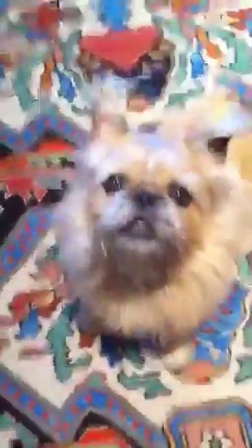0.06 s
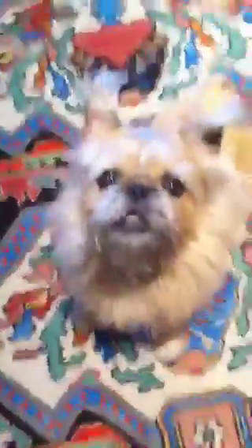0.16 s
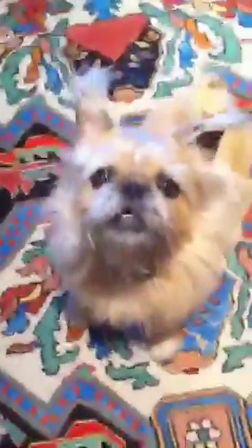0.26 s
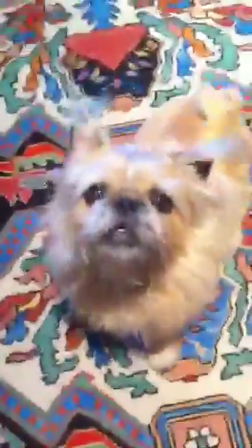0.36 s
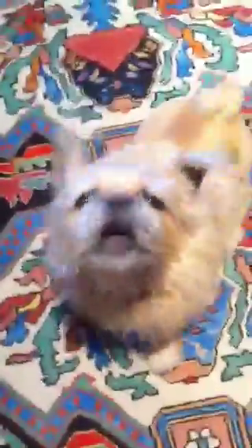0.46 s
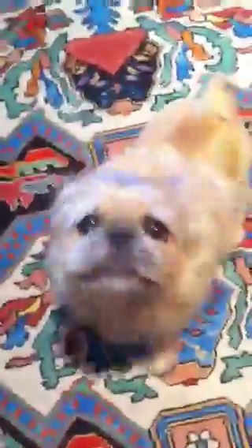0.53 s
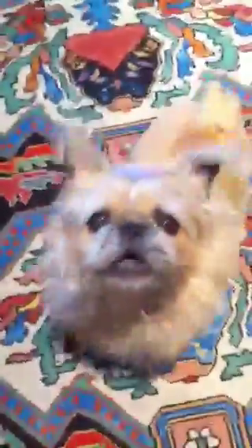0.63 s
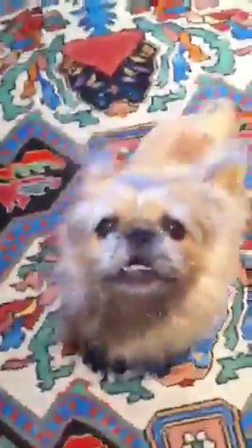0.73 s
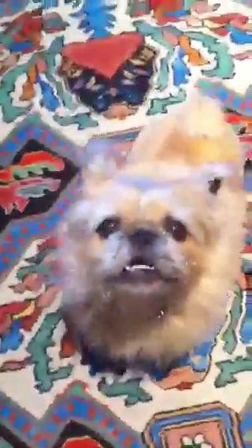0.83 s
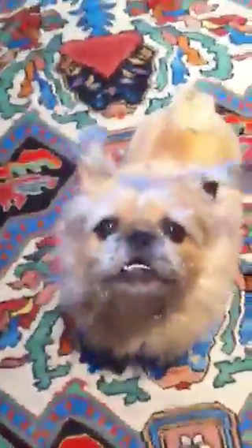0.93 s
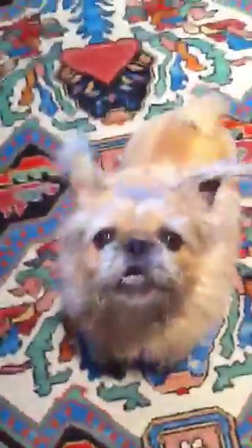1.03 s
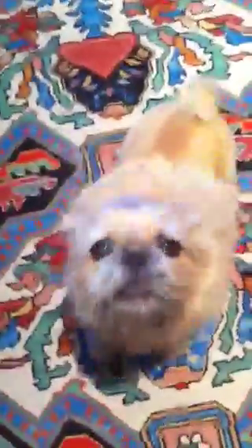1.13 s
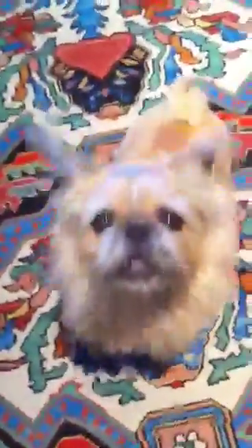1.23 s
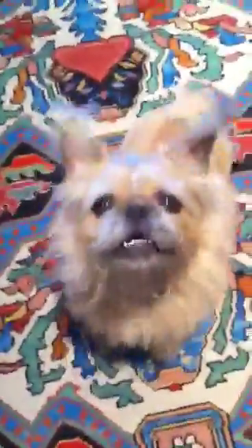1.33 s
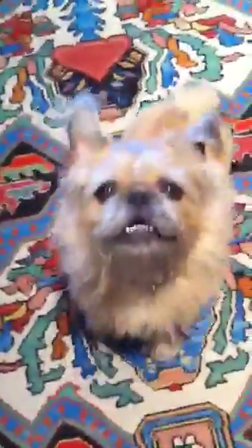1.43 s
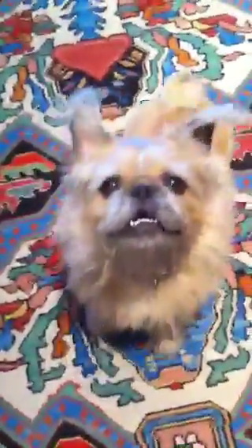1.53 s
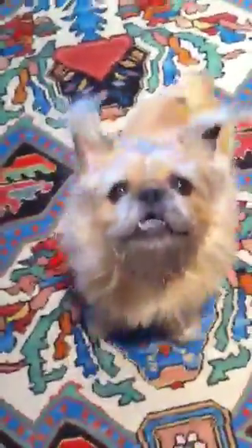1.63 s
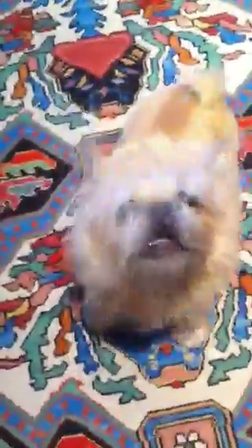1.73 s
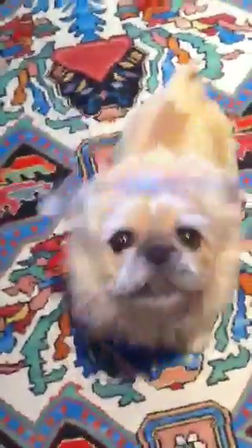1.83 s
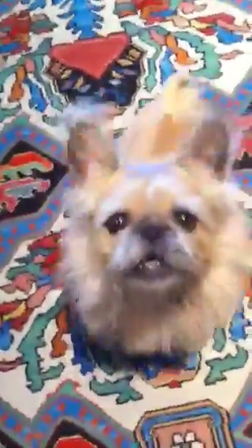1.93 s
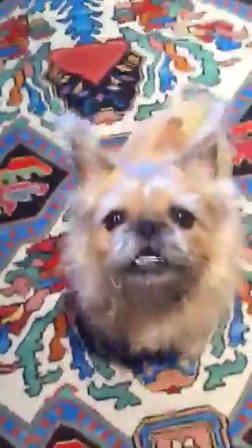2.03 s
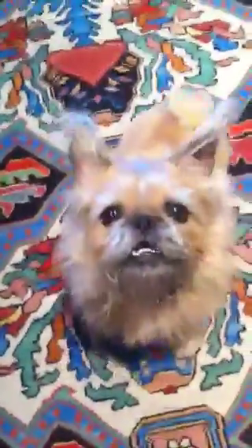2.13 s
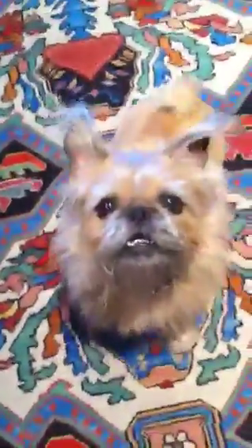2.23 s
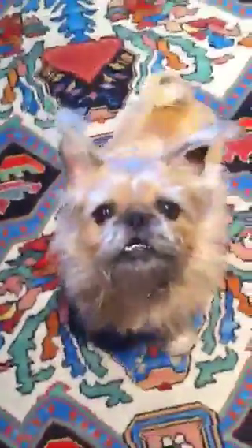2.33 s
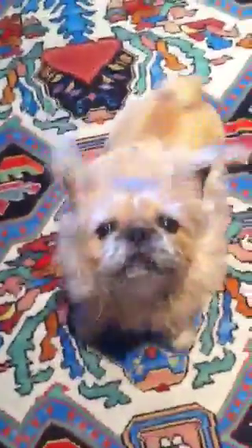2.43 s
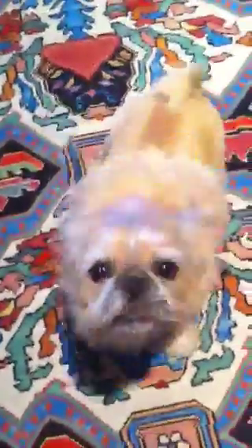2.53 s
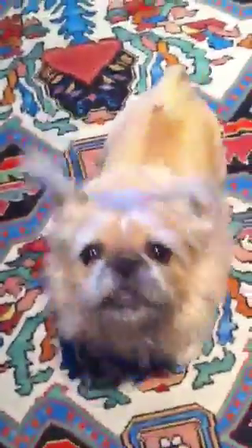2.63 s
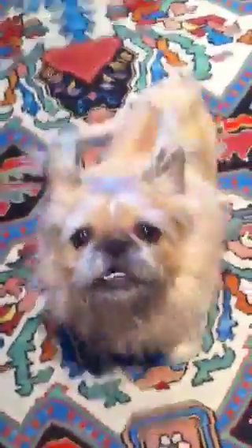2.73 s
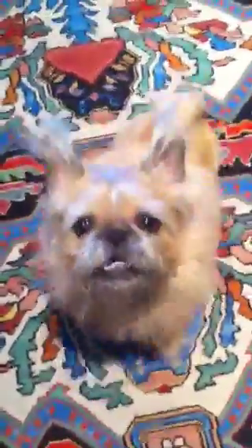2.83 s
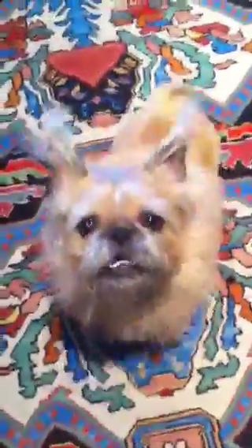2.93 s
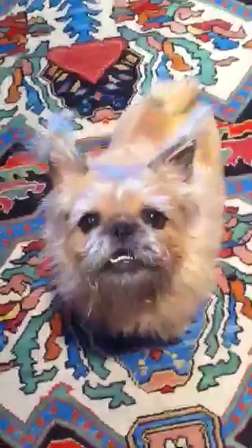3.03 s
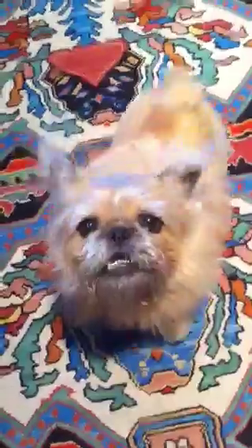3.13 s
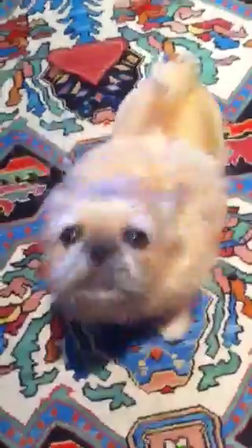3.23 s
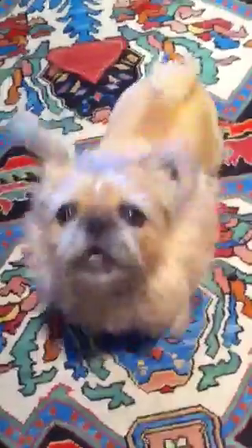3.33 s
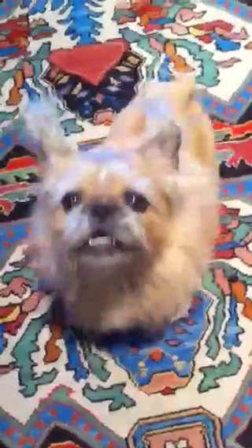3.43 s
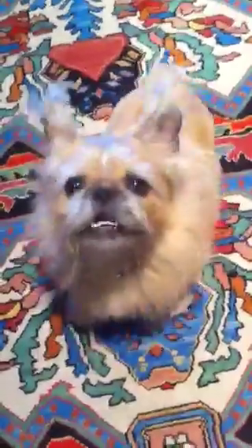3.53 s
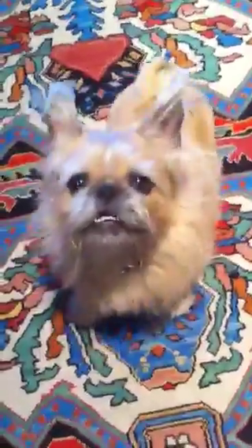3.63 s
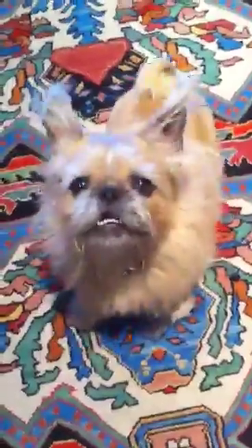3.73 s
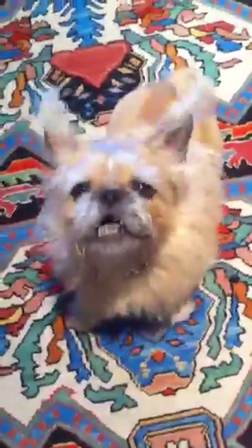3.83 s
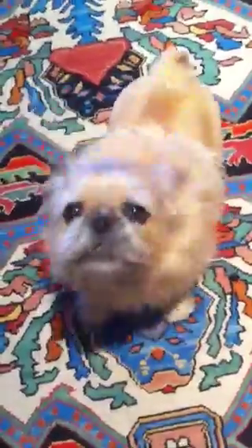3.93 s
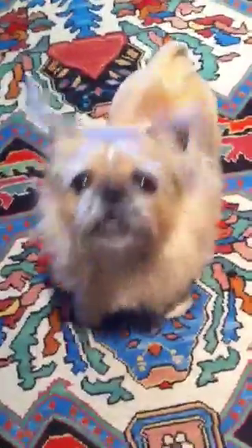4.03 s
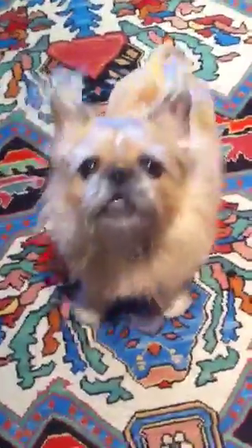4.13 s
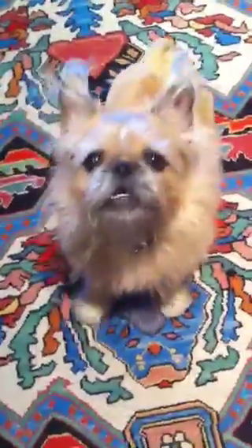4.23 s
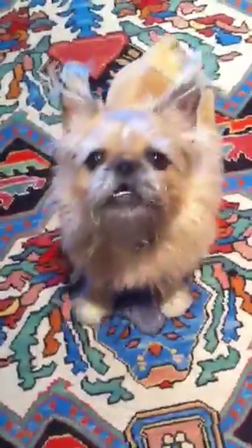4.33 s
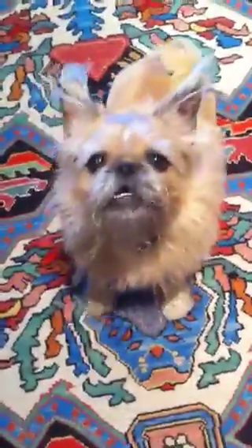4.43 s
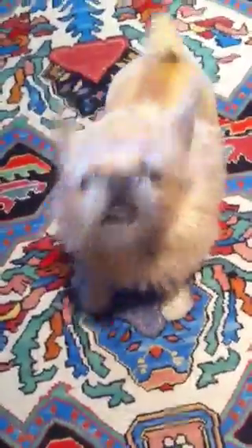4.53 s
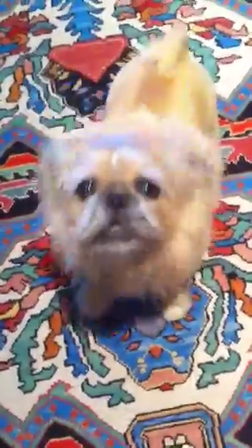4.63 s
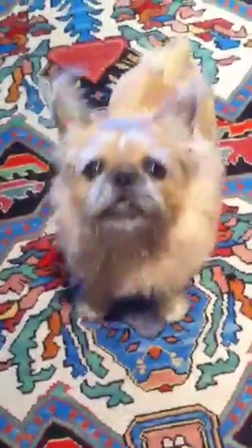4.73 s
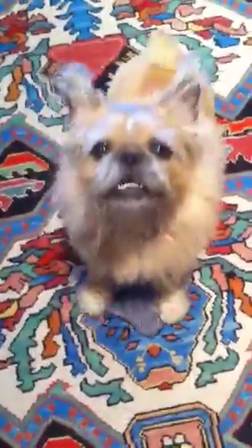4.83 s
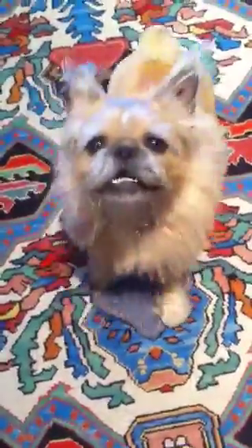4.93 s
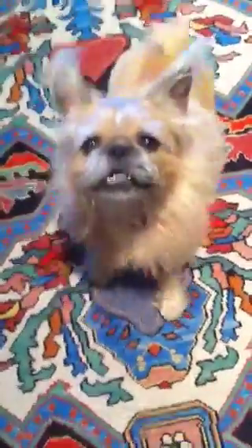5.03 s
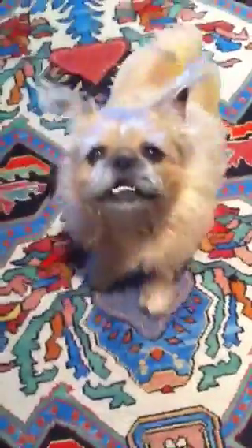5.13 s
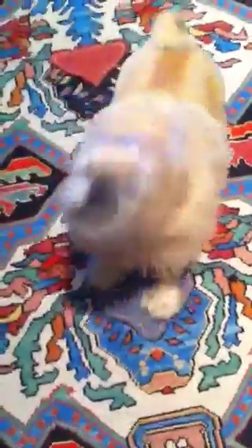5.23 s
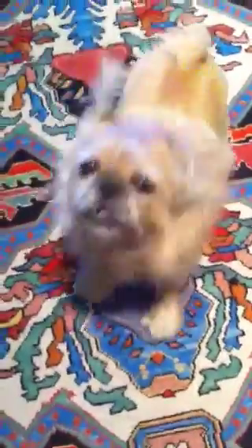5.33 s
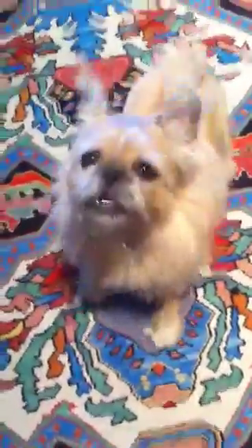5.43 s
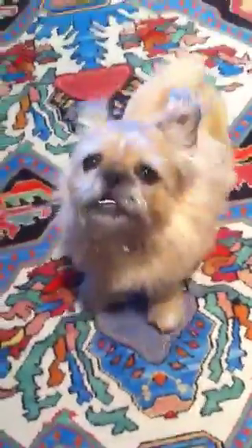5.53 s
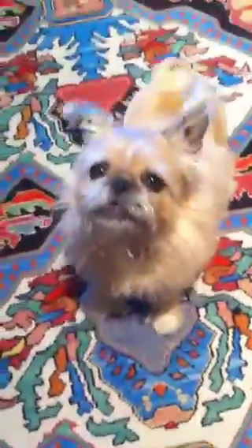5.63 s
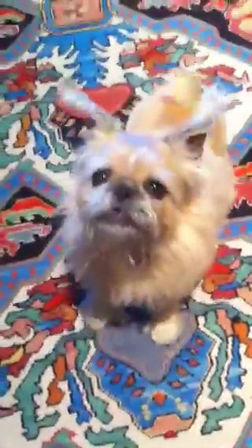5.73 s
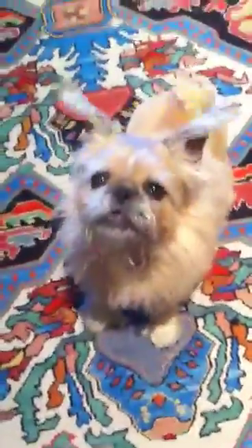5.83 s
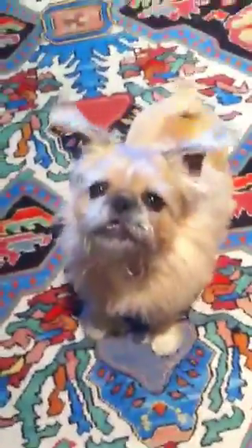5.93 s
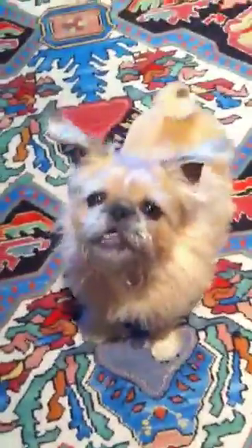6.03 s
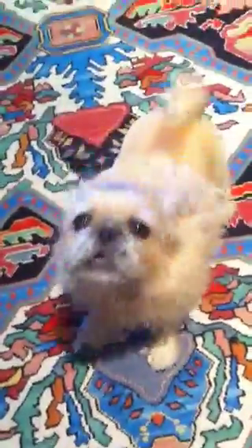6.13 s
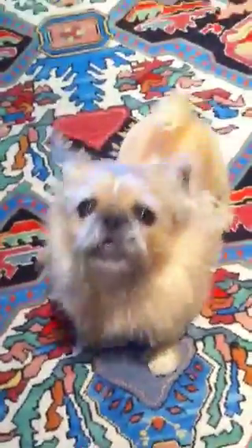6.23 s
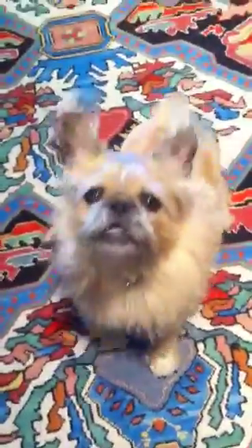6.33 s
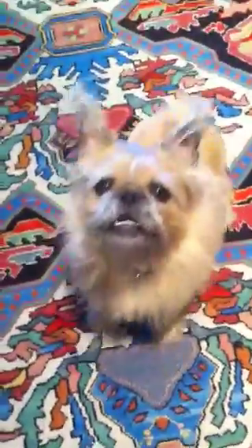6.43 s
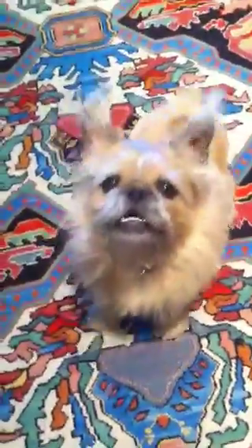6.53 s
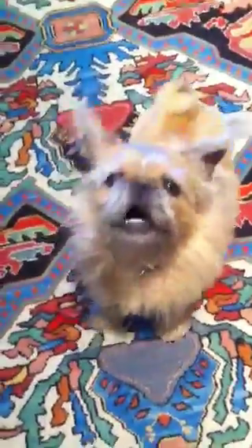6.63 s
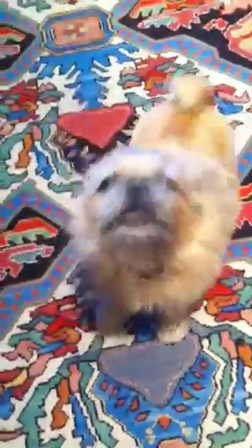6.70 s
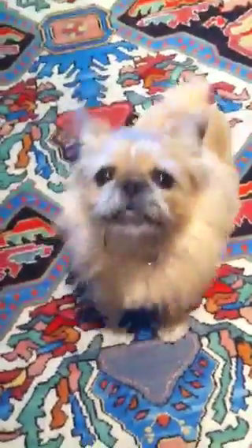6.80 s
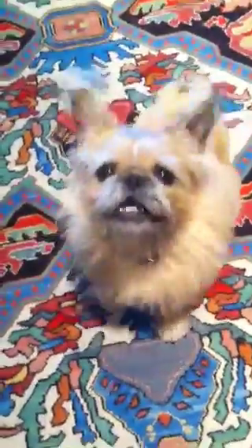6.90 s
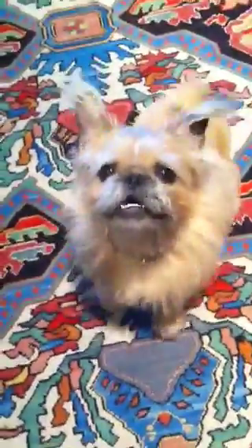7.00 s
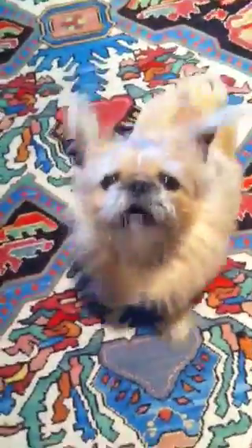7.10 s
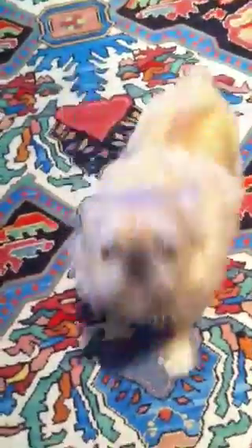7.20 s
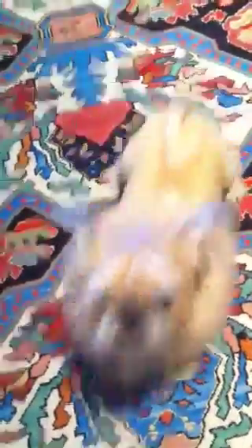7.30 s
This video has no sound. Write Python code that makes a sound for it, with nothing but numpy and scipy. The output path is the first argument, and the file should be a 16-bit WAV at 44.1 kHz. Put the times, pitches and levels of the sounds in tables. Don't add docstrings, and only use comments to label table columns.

```python
import sys
import numpy as np
from scipy import signal
from scipy.fft import rfft, irfft
from scipy.io import wavfile
from scipy.ndimage import uniform_filter1d

SR = 44100
rng = np.random.default_rng(int(sys.argv[2]) if len(sys.argv) > 2 else 0)


def store_pcm(level_fs):
    pcm = np.round(np.clip(level_fs, -1, 1) * 32767).astype(np.int16)
    wavfile.write(sys.argv[1], SR, np.atleast_2d(pcm).T)


def ratio(d):
    e = np.asarray(d, float) / 20
    return 10 ** e


N = 324576
LEAD = 16384

# (start [s], length [s], effort [dB], jaw re throat [dB], mouth re throat [dB])
BARKS = [(-.33, 0.066, -2.5, -6, -13), (0.549, 0.099, -10.5, -8.5, -17.5),
         (1.17, 0.081, -12.5, -7.5, -18.5), (1.813, 0.087, -12, -7, -13), (2.551, 0.1, -12, -6.5, -10),
         (3.282, 0.083, -11.5, -4.5, -6.5), (3.959, 0.11, -10, -7.5, -17), (4.613, 0.1, -11, -6.5, -14.5),
         (5.299, .1, -15, -1.5, -4.5), (6.173, 0.11, -9.5, -7.5, -17.5), (6.749, 0.1, -11.5, -2.5, -13),
         (7.223, 0.12, -5, -4.5, -8.5)]
# (first pitch [Hz], top pitch [Hz], climb [s], hold [s])
SLIDES = [(718.4, 971, .02, .015), (868, 980, 0.013, 0.035), (872, 970, 0.014, 0.04),
          (868, 1050, .03, 0.024), (564, 1000, .034, .008), (538.8, 950, .028, .012),
          (881.6, 1010, .02, 0.022), (707, 950, 0.021, 0.016), (540.8, 1130, .03, 0.037),
          (739, 990, 0.021, 0.0089), (798.8, 1080, .04, 0.031), (608.5, 1170, 0.031, .012)]
# (frequency [Hz], width [Hz], level [dB])
THROAT_MODES = [(526, 276, 3.5), (999, 490, 6.5), (1110, 1500, -15.5)]
JAW_MODES = [(1334, 673, 2), (1913, 220, 3.5), (2088, 365, -0.5)]
MOUTH_MODES = [(2930, 680, 1), (3845, 904, 5), (4130, 686, 5.5), (4920, 1100, -10)]
TEETH_MODES = [(5850, 800, -3), (8330, 1380, 2), (11370, 2200, 0.5), (14000, 1800, -1.5)]
# (start [s], length [s], top reed pitch [Hz], eased reed pitch [Hz], level [dB])
SQUEAKS = [
    (0.394, 0.079, 1246, 1225, -33),
    (1.419, 0.09, 1435, 1347, -32),
    (2.135, .088, 1194, 1171, -38),
    (2.856, .088, 1281, 1216, -34),
    (3.65, 0.075, 1186, 1149, -39),
    (4.362, 0.099, 1304, 1217, -33),
    (4.991, 0.1, 1183, 1083, -38),
]
# (frequency [Hz], partial level [dB])
SHELL = [(1000, 11), (1400, -12), (2400, -28.5), (3600, -15.5), (4700, -3.5), (6000, -18.5), (8300, -8),
         (10000, -22.5), (12000, -11.5), (14500, -36), (15900, -20)]
# (start [s], peak [dB], centre [Hz], t60 [s])
STEPS = [
    (0.899, -44.5, 864, 0.11),
    (5.152, -50.5, 2340, 0.12),
    (5.194, -49, 738, 0.1),
    (5.254, -42, 780, 0.046),
    (6.668, -38.5, 750, 0.07),
]
# (start [s], end [s], frequency [Hz], width [Hz], level [dB])
HELD_TONES = [
    (0.39, 1.15, 3400, 100, -68),
    (2.042, 2.202, 285, 18, -60),
    (6.025, 6.05, 1130, 63, -60),
    (2.81, 2.83, 2000, 120, -46.5),
    (3.19, 3.215, 1930, 250, -49),
    (2.385, 2.47, 3300, 900, -64.5),
    (7.165, 7.21, 2500, 250, -58),
]
# (start [s], length [s], rustle [dB], shuffle [dB])
STIRRINGS = [(0.327, 0.26, -75, -60), (0.471, 0.051, -77, -71), (0.696, 0.11, -61.5, -52),
             (0.832, 0.34, -60.5, -61.5), (1.35, 0.082, -61, -47.5), (1.47, 0.36, -61.5, -60.5),
             (1.894, 0.049, -60, -39), (1.998, 0.097, -68, -53), (2.196, 0.1, -69, -62.5),
             (2.373, .1, -69, -56.5), (2.656, 0.2, -59, -46.5), (2.93, 0.25, -63.5, -62),
             (3.158, 0.12, -59, -49.5), (3.377, 0.34, -62.5, -60), (3.73, 0.044, -66, -59),
             (3.869, 0.079, -67, -58.5), (4.15, 0.063, -67, -62), (4.24, 0.13, -68.5, -76),
             (4.46, 0.19, -74, -64), (4.694, 0.068, -61, -41), (4.79, 0.15, -59.5, -52.5),
             (4.968, 0.3, -59, -60), (5.385, 0.053, -56, -63), (5.57, 0.17, -64.5, -66),
             (5.947, .1, -69, -82.5), (6.254, 0.24, -59.5, -48.5), (6.552, .17, -64, -62),
             (6.823, 0.056, -48, -69), (6.938, 0.16, -75, -60), (7.124, 0.097, -66.5, -59)]
# (frequency [Hz], density [dB per Hz])
FUR_SPECTRUM = [(1470, -44), (2500, -10), (3460, -2), (4420, -10), (5320, -4), (10600, -6.5), (11700, -7),
                (15800, -12.5)]
RUG_SPECTRUM = [(180, -38.5), (300, -15.5), (583, -28), (749, -16.5), (1010, -15), (1150, -12.5),
                (2430, -16.5), (6000, -37.5), (7800, -57), (13200, -120)]
ROOM_TONE_SPECTRUM = [(15, -75.5), (25, -18.5), (33, -27), (91, -32.5), (123, 2), (157, -6.5), (248, -5.5),
                      (291, -10.5), (371, -5.5), (473, -8.5), (1090, -17.5), (2200, -37.5), (15800, -29)]
# (frequency [Hz], t60 [s])
ROOM_T60 = [(250, 0.71), (700, 0.78), (2000, 0.56), (5000, 0.34), (12000, 0.37)]
# (frequency [Hz], width [Hz], level [dB])
ROOM_MODES = [(539.6, 36, -8), (1110, 31, 1.5), (1130, 64, -10), (762, 32, 7)]

BREAK_S, BROKEN_HZ, LAST_HZ = 0.009, 663.2, 560.8
CLIMB_DB, BREAK_DB, SAG_DB_PER_S = 1, -5.5, 125.5
JAW_BREAK_DB, JAW_LAST_DB = 10, -3
MOUTH_SHUTS_DB_PER_S, HISS_FADE_DB_PER_S = 142, 130
HOARSE_SHARE = 0.7
CLEAR_S, CLEAR_S_PER_OCTAVE = 0.007, 0.011
ATTACK_S, ATTACK_S_PER_OCTAVE = 0.017, 0.0074
CHEST_HZ, CHEST_DB = 237, -37

REED_REST_HZ, REED_START_SHARE = 1034.4, 0.75
REED_WAKE_S, REED_WAKE_SHARE = 0.004, 0.85
PRESS_SHARE, EASE_SHARE, LET_GO_S = 0.24, 0.4, 0.013
REED_DB_PER_OCTAVE, LET_GO_DB = 29, -21
LOWEST_START_DB, LOWEST_END_DB = 1, -4


def at_hz(points, hz):
    point_hz, value = np.transpose(points)
    return np.interp(np.log(hz + 1), np.log(point_hz), value)


def rms_one(x):
    return x / np.sqrt(np.mean(x ** 2) + 1e-20)


def lowpass(x, hz):
    return signal.sosfilt(signal.butter(2, hz, fs=SR, output="sos"), x)


def bandpass(x, low_hz, high_hz):
    return signal.sosfilt(signal.butter(2, [low_hz, high_hz], "band", fs=SR, output="sos"), x)


def drift(size, hz):
    return rms_one(lowpass(rng.standard_normal(size + 4000), hz)[4000:])


def coloured(spectrum):
    white = rfft(rng.standard_normal(N))
    return rms_one(irfft(white * ratio(at_hz(spectrum, np.fft.rfftfreq(N, 1 / SR))), N))


def resonances(x, modes):
    out = 0
    for k, (hz, width_hz, db) in enumerate(modes):
        r = np.exp(-np.pi * width_hz / SR)
        b = (1 - r * r) / 2 * np.array([1, 0, -1])
        a = [1, -2 * r * np.cos(2 * np.pi * hz / SR), r * r]
        out = out + (-1) ** k * ratio(db) * signal.lfilter(b, a, x)
    return out


def patchy(x, patch_db):
    out = 0
    for low_hz in 1500 * 1.16 ** np.arange(16):
        out = out + bandpass(x, low_hz, low_hz * 1.16) * ratio(patch_db * drift(len(x), 12.4))
    return rms_one(out) * np.sqrt(np.mean(x ** 2))


def edges(size, rise_s, fall_s):
    t = np.arange(size) / SR
    return np.clip(t / rise_s, 0, 1) * np.clip(t[::-1] / fall_s, 0, 1)


def add_at(out, start_s, x):
    at = LEAD + round(start_s * SR)
    out[at:at + len(x)] += x


def in_time(rows, t):
    s, *columns = np.transpose(rows)
    return [np.interp(t, s, c) for c in columns]


def bark_shape(row, slide):
    s, length_s, effort_db, jaw_db, mouth_db = row
    first_hz, top_hz, climb_s, hold_s = slide
    turns = np.append(np.cumsum([0, climb_s, hold_s, BREAK_S]), length_s)
    last_db = BREAK_DB - SAG_DB_PER_S * (turns[4] - turns[3])
    hz = [first_hz, top_hz, top_hz, BROKEN_HZ, LAST_HZ]
    throat_db = effort_db + np.array([CLIMB_DB, 0, 0, BREAK_DB, last_db])
    jaw_db = jaw_db + np.array([0, 0, 0, JAW_BREAK_DB, JAW_LAST_DB])
    return np.transpose([s + turns, hz, throat_db, jaw_db, mouth_db - MOUTH_SHUTS_DB_PER_S * turns])


def glottis(hz, hoarse):
    size = len(hz)
    cycles = np.cumsum(hz * (1 + 0.08 * hoarse * drift(size, 150))) / SR
    order = np.arange(1, 15)[:, None]
    waver = np.array([drift(size, 60) for _ in order])
    partials = np.cos(2 * np.pi * order * cycles + 0.6 * order ** 2)
    pulses = np.sum(partials * order ** -0.8 * ratio(8 * hoarse * waver), axis=0)
    pairs = 1 + 0.8 * hoarse * np.cos(np.pi * cycles + drift(size, 30))
    breath = rng.standard_normal(size) * (1 + 0.5 * np.cos(2 * np.pi * cycles))
    return pulses * pairs + (1.4 * hoarse + 0.12) * breath, breath


def tract(source, modes):
    steep = signal.butter(6, 430, "high", fs=SR, output="sos")
    part = signal.sosfilt(steep, resonances(resonances(source, modes), modes))
    return part / np.sqrt(uniform_filter1d(part ** 2, size=600) + 1e-9)


def bark(rows, clear_s, attack_s):
    t = np.arange(rows[0][0], rows[-1][0], 1 / SR)
    age_s = t - t[0]
    hz, level_db, jaw_db, mouth_db = in_time(rows, t)
    hoarse = HOARSE_SHARE * np.clip(2 * age_s / clear_s - 1, 0.1, 1)
    source, breath = glottis(hz, hoarse)
    throat, jaw, mouth, teeth = [tract(source, modes)
                                 for modes in (THROAT_MODES, JAW_MODES, MOUTH_MODES, TEETH_MODES)]
    clumps = ratio(2 * hoarse * drift(len(t), 50))
    hiss = ratio(-27 - HISS_FADE_DB_PER_S * age_s) * patchy(teeth, 2.5)
    chest = ratio(CHEST_DB) * rms_one(resonances(breath, [(CHEST_HZ, 250, 0), (60, 80, -3)]))
    voice = throat - ratio(jaw_db) * jaw + ratio(mouth_db) * clumps * mouth + hiss + chest
    return edges(len(t), attack_s, 0.0072) ** 2 * ratio(level_db) * voice


def dog(effort_db=4.5):
    out = np.zeros(N + LEAD)
    for row, slide in zip(BARKS, SLIDES):
        octaves = np.log2(slide[1] / slide[0])
        clear_s = CLEAR_S + CLEAR_S_PER_OCTAVE * octaves
        attack_s = ATTACK_S + ATTACK_S_PER_OCTAVE * octaves
        add_at(out, row[0], ratio(effort_db) * bark(bark_shape(row, slide), clear_s, attack_s))
    return out


def squeak_shape(s, length_s, top_hz, eased_hz, level_db):
    turns = np.array([0, REED_WAKE_S, PRESS_SHARE * length_s, EASE_SHARE * length_s,
                      length_s - LET_GO_S, length_s])
    start_hz = REED_REST_HZ + REED_START_SHARE * (top_hz - REED_REST_HZ)
    hz = np.array([REED_WAKE_SHARE * start_hz, start_hz, top_hz, eased_hz, REED_REST_HZ * 1.02, REED_REST_HZ])
    level_db = level_db + REED_DB_PER_OCTAVE * np.log2(hz / top_hz) + LET_GO_DB * (turns == length_s)
    lowest_db = np.interp(turns, [0, length_s], [LOWEST_START_DB, LOWEST_END_DB])
    return np.transpose([s + turns, hz, level_db, lowest_db])


def squeak(rows, air_db=-23.0, squeeze_db=-21):
    t = np.arange(rows[0][0], rows[-1][0], 1 / SR)
    hz, level_db, lowest_db = in_time(rows, t)
    cycles = np.cumsum(hz * (1 + 0.004 * drift(len(t), 250))) / SR
    order = np.arange(1, 15)[:, None]
    partial_hz = order * hz
    gain = ratio(at_hz(SHELL, partial_hz) + (order == 1) * lowest_db) * (partial_hz < 16000)
    buzz = np.sum(gain * np.sin(2 * np.pi * order * cycles + 0.81 * order ** 2), axis=0)
    leak = np.diff(rng.standard_normal(len(t) + 1)) * (1 + np.cos(2 * np.pi * cycles))
    squeeze = drift(len(t), 150) * np.exp(-(t - t[0]) / 0.0067)
    sound = buzz + ratio(air_db) * leak + ratio(squeeze_db) * squeeze
    return edges(len(t), 0.0019, 0.021) * ratio(level_db + 4.0) * sound


def toy():
    out = np.zeros(N + LEAD)
    for row in SQUEAKS:
        add_at(out, row[0], squeak(squeak_shape(*row)))
    return out


def steps(dull_hz=3500):
    out, t = np.zeros(N + LEAD), np.arange(6000) / SR
    for s, peak_db, hz, t60_s in STEPS:
        noise = lowpass(rng.standard_normal(len(t)), dull_hz)
        puff = noise * ratio(-60 * t / t60_s) * np.clip(t / 0.0045, 0, 1)
        modes = [(hz, 2.93 * hz, 0), (2.9 * hz, 1500, -8)]
        add_at(out, s, ratio(peak_db + 15.5) * resonances(puff, modes))
    return out


def held_tones():
    out = np.zeros(N)
    for start_s, end_s, hz, width_hz, db in HELD_TONES:
        a, size = round(start_s * SR), round((end_s - start_s) * SR)
        mode = [(hz, width_hz, 0)]
        tone = resonances(resonances(rng.standard_normal(size), mode), mode)
        out[a:a + size] += ratio(db) * rms_one(tone) * edges(size, 0.003, 0.0014)
    return out


def stirring(fur_rest_db=-84, rug_rest_db=-71.5, edge_s=0.05):
    t, gains = np.arange(N) / SR, ratio([[fur_rest_db], [rug_rest_db]])
    for s, length_s, rustle_db, shuffle_db in STIRRINGS:
        inside_s = np.minimum(t - s, s + length_s - t)
        swell = np.clip(inside_s / edge_s + 0.5, 0, 1) ** 2
        gains = gains + ratio([[rustle_db], [shuffle_db]]) * swell
    return gains


def fur_and_rug():
    fur, rug = stirring()
    rustle = fur * patchy(coloured(FUR_SPECTRUM), 2.0)
    shuffle = rug * ratio(0.83 * drift(N, 30)) * coloured(RUG_SPECTRUM)
    return rustle + shuffle


def room(x):
    t, tail = np.arange(SR) / SR, 0
    for low_hz in 177 * 2 ** np.arange(0, 6.5, 0.5):
        band = bandpass(rng.standard_normal(SR), low_hz, low_hz * np.sqrt(2))
        tail = tail + band * ratio(-60 * t / at_hz(ROOM_T60, low_hz * 0.83))
    tail = rms_one(tail * np.clip(t / 0.0031, 0, 1)) / np.sqrt(SR)
    tail += resonances(tail, ROOM_MODES)
    for delay_s, db in [(0.0031, -20.5), (0.0087, 5.5), (0.0143, 7.5), (0.022, -1)]:
        tail[round(delay_s * SR)] += ratio(db)
    return signal.fftconvolve(x, tail)[:len(x)]


def room_tone(level_db=-64.5, sway_db=2.5):
    return ratio(level_db + sway_db * drift(N, 2.1)) * coloured(ROOM_TONE_SPECTRUM)


def scene():
    far, near = dog() + steps(), toy()
    heard = far + near + ratio(-18.0) * room(far + ratio(-3) * near)
    return (heard[LEAD:] + held_tones() + fur_and_rug() + room_tone())[None]


def limiter(x, ceiling_db=-3.5, release_db_per_s=60.0, ahead_s=0.006, attack_hz=70.0):
    t = np.arange(N) / SR
    over_db = np.maximum(20 * np.log10(np.abs(x[0]) + 1e-9) - ceiling_db, 0)
    held_db = np.maximum.accumulate(over_db + release_db_per_s * t) - release_db_per_s * t
    r = np.exp(-2 * np.pi * attack_hz / SR)
    cut_db = np.interp(t + ahead_s, t, signal.lfilter([1 - r], [1, -r], held_db))
    return x * ratio(-cut_db)


def top_cut(x):
    return signal.sosfilt(signal.butter(12, 15950, fs=SR, output="sos"), x)


def record(dry):
    x = limiter(dry)
    x = x + 0.004 * x ** 2
    x = x / (1 + np.abs(x / 0.73) ** 12) ** (1 / 12)
    x = signal.sosfilt(signal.cheby2(18, 60, 16250, fs=SR, output="sos"), x)
    return top_cut(x)


dry = scene()
out = record(dry)
store_pcm(out)
```